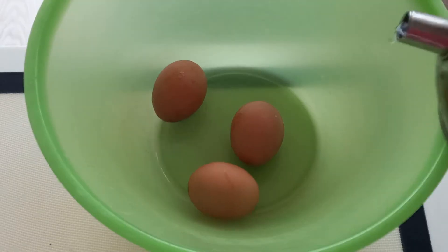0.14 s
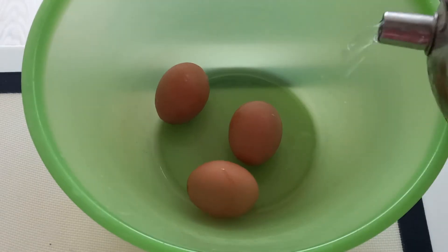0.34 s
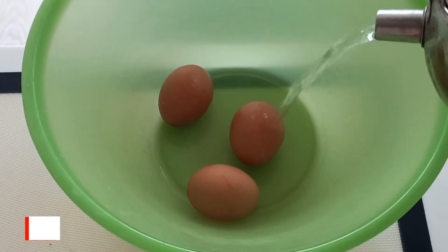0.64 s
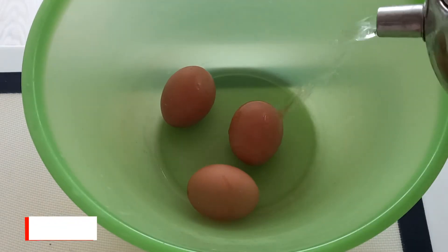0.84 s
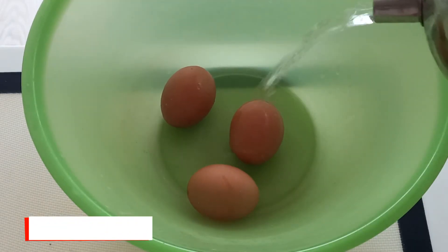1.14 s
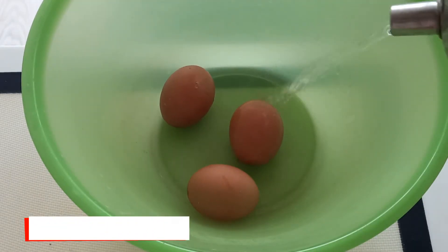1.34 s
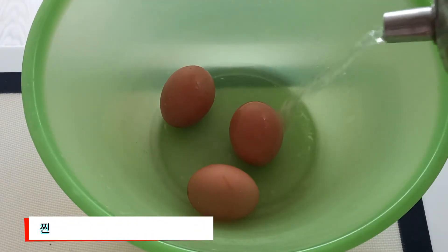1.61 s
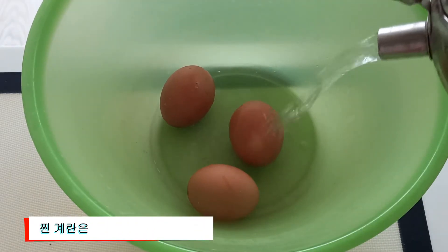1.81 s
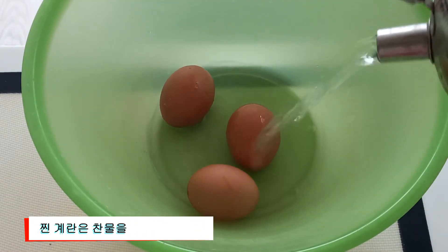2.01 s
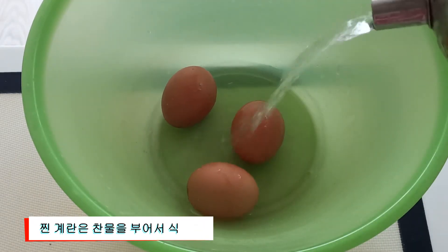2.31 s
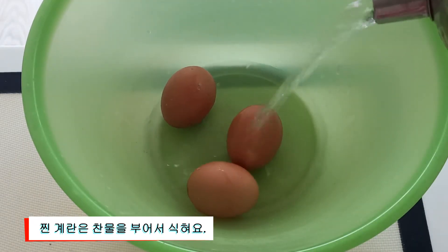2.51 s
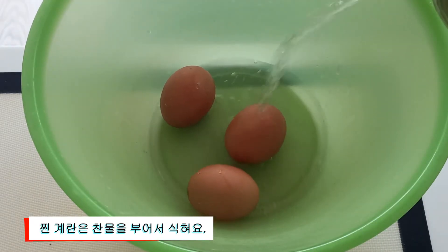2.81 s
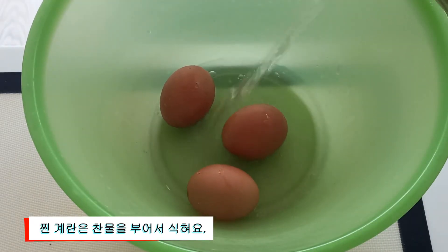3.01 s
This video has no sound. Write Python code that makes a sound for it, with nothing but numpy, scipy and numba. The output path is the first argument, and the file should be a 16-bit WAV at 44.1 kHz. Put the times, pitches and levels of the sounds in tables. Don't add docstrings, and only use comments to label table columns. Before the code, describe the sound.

Pouring water splashes into a shallow plastic bowl of eggs after a short kettle knock and rattle; lively plops, gulps and crisp droplets continue to the end, close to a phone in a small room.

```python
import sys
import numpy as np
from scipy import signal
from scipy.fft import rfft, irfft
from scipy.io import wavfile
from scipy.ndimage import uniform_filter1d
from numba import njit

SR = 44100
rng = np.random.default_rng(int(sys.argv[2]) if len(sys.argv) > 2 else 0)


def decibels_to_gain(level_db):
    exponent = np.asarray(level_db, float) / 20
    return 10 ** exponent


def wav_out(sig):
    wavfile.write(sys.argv[1], SR, np.round(np.clip(np.atleast_2d(sig).T, -1, 1) * 32767).astype(np.int16))


N = 138915

# start in seconds, level in dB, pitch in Hz.
AIR_GULPS = [(0.384, -47.5, 446), (0.686, -47, 460), (0.888, -47, 433), (1.122, -45, 320),
             (1.235, -42, 436), (1.482, -43.5, 423), (1.6, -41.5, 451), (1.779, -44, 405),
             (1.891, -38, 448), (2.128, -47.5, 456), (2.242, -44.5, 447), (2.357, -48, 379),
             (2.479, -38.5, 449.5), (2.593, -45, 435), (2.726, -41, 464), (2.894, -44, 491),
             (0.611, -59.5, 396), (0.843, -53.5, 345), (0.959, -48.5, 356.5), (1.536, -50, 404),
             (1.676, -49.5, 431), (1.976, -52, 458), (2.16, -51, 349.6), (2.529, -71, 437),
             (2.712, -44.5, 418), (3.005, -51.5, 466)]
# start in seconds, level in dB, pitch in Hz, ring time in seconds.
PLOP_BUBBLES = [(.552, -47.5, 1420, 0.04), (.645, -42.5, 868, 0.29), (.692, -30.5, 1064, 0.027),
                (.766, -32, 1235, 0.023), (.777, -27, 1356, 0.035), (.808, -25, 950, 0.013),
                (.924, -27, 1165, 0.035), (1.002, -42.5, 669, 0.14), (1.081, -32, 1350, 0.023),
                (1.117, -44, 584, 0.054), (1.259, -36, 555, 0.048), (1.28, -38.5, 1073, 0.057),
                (1.292, -42.5, 685, .15), (1.343, -47, 668, 0.17), (1.367, -36.5, 1080, 0.036),
                (1.497, -28, 956, .06), (1.542, -41, 990, 0.039), (1.58, -30.5, 1389, 0.046),
                (1.608, -24, 1048, 0.029), (1.612, -35.5, 682, 0.04), (1.664, -60, 950, 0.027),
                (1.694, -26, 1180, 0.051), (1.74, -34.5, 1362, 0.083), (1.776, -34, 1000, 0.026),
                (1.791, -36.5, 863, 0.071), (1.851, -35.5, 690, 0.17), (1.892, -35, 920, .08),
                (2.013, -23.5, 1033, 0.032), (2.047, -49, 870, 0.044), (2.104, -35.5, 653, 0.04),
                (2.123, -32, 890, 0.033), (2.135, -30.5, 1003, 0.039), (2.163, -41, 1020, 0.037),
                (2.24, -31.5, 856, 0.026), (2.252, -30, 986, 0.047), (2.298, -45.5, 1125, 0.16),
                (2.35, -36, 903, .04), (2.388, -38.5, 690, 0.079), (2.452, -32.5, 1216, 0.03),
                (2.489, -26, 940, 0.033), (2.535, -38.5, 1100, 0.046), (2.55, -43, 690, 0.067),
                (2.595, -32.5, 735, 0.04), (2.615, -34, 697, 0.05), (2.707, -35.5, 888, 0.086),
                (2.73, -25, 852, 0.055), (2.89, -42.5, 688, 0.1), (2.938, -36, 707, 0.12),
                (2.989, -26, 1000, 0.031), (3.123, -42.5, 1410, 0.044)]
# start in seconds, level in dB, pitch in Hz.
DROP_TICKS = [(0.534, -35.5, 6270), (0.6802, -32.5, 2720), (0.767, -28.5, 2680), (0.7796, -25.5, 2360),
              (0.9703, -31.5, 6030), (1.052, -22.5, 6850), (1.0811, -27, 2456), (1.3442, -32, 2830),
              (1.4182, -19.5, 6620), (1.7297, -18, 6500), (1.887, -20.5, 3930), (1.901, -24.5, 2700),
              (1.9455, -16, 6200), (1.9583, -22, 5840), (2.0464, -13.5, 6080), (2.127, -34, 2800),
              (2.2416, -27.5, 2710), (2.2713, -26, 2800), (2.3018, -27.5, 5600), (2.4483, -26, 2510),
              (2.5265, -22.5, 3620), (2.628, -20.5, 4200), (2.7092, -25.5, 2800), (2.7569, -17.5, 2030),
              (2.858, -19, 6600), (3.0018, -28.5, 2960), (0.649, -34, 1636), (0.7205, -32.5, 5340),
              (1.1504, -32, 4700), (1.2395, -41, 2280), (1.2586, -31.5, 2020), (1.4774, -37.5, 2780),
              (1.607, -38, 2860), (1.75, -25.5, 5430), (1.7758, -35.5, 2830), (1.814, -42, 5270),
              (1.8441, -28, 4730), (1.8534, -21.5, 6600), (1.993, -25, 6040), (2.0106, -17, 6360),
              (2.163, -32.5, 2680), (2.3222, -31.5, 1530), (2.3521, -28.5, 2800), (2.478, -33.5, 2970),
              (2.5147, -23, 6140), (2.5881, -25.5, 6700), (2.5981, -33.5, 2790), (2.8884, -32, 6300),
              (2.9618, -25.5, 3700), (3.087, -30, 6420)]
# start in seconds, level in dB.
FILM_SNAPS = [
    (2.478, -28.5),
    (2.9604, -22.5),
]
# time in seconds, splash level in dB.
STREAM_FLOW = [(0.523, -47.5), (.6, -62.5), (.7, -46), (0.818, -59), (1.02, -57.5), (1.1, -46.5),
               (1.23, -52), (1.33, -47.5), (1.682, -46.5), (1.72, -41.5), (2.04, -43.5), (2.21, -50.5),
               (2.3, -47), (2.82, -46), (2.981, -42.5), (3.06, -100), (3.14, -43)]
# start in seconds, level in dB.
SPRAY_BURSTS = [(0.7617, -35.5), (1.053, -44.5), (1.142, -42), (1.2548, -31.5), (1.422, -39),
                (1.711, -35.5), (1.889, -30), (2.0173, -40.5), (2.278, -36), (2.322, -52), (2.477, -40),
                (2.6153, -30.5), (2.7127, -29.5), (2.852, -34.5), (2.957, -33), (3.081, -49)]
# frequency in Hz, level in dB per Hz.
SPLASH_COLOUR = [(1200, -10.5), (2000, -4.5), (2900, -5.5), (3500, -3.5), (5200, -4), (6600, 5.5),
                 (7300, -2)]
# frequency in Hz, level in dB per Hz.
SPRAY_COLOUR = [(7700, -25), (8600, -7), (13000, 2), (15800, 1.5)]
# frequency in Hz, level in dB per Hz.
SLOSH_COLOUR = [(45, -29), (72, 3.5), (130, -5.5), (220, -14.5), (400, 4), (1500, -26)]
# frequency in Hz, level in dB, 60 dB decay time in seconds.
BOWL_MODES = [(385, -8, .1), (447, -3, .1), (695, -1, .13), (888, -3, .1)]
# start in seconds, level in dB, rattle length in seconds.
KETTLE_BUMPS = [
    (0.163, -12.5, 0.021),
    (0.212, -19, 0.026),
    (0.249, -36, 0.011),
    (0.26, -22, 0.022),
    (0.319, -41, 0.023),
]
# frequency in Hz, bandwidth in Hz, level in dB.
KETTLE_MODES = [(560, 35, 7), (808, 40, 7), (1187, 120, 0)]
# frequency in Hz, level in dB per Hz.
CLATTER_COLOUR = [(60, -46), (115, -9), (250, -19.5), (500, -4.5), (2200, -18), (3000, -33.5),
                  (7000, -47.5)]
# frequency in Hz, level in dB per Hz.
KITCHEN_COLOUR = [(40, -34), (75, 4), (175, -13), (260, -9), (3000, -34), (16000, -44)]

BUBBLES_PER_S, DROPS_PER_S, MIST_PER_S = 110, 500, 2500
BUMP_DB, CLATTER_DB = -12.5, -7.5
THUD_S, THUD_HZ, THUD_DB = 0.295, 76, -32
ROOM_T60_S, ROOM_DB, ROOM_DULL_HZ = 0.34, -4, 3320
KITCHEN_DB = -69.5
TOP_HZ = 15900


def shape(x, points):
    p = np.array(points, float)
    log_hz = np.log(np.arange(N // 2 + 1) * SR / N + 1)
    log_points = np.log(p[:, 0])
    beyond = np.maximum(log_points[0] - log_hz, 0) + np.maximum(log_hz - log_points[-1], 0)
    db = np.interp(log_hz, log_points, p[:, 1]) - 40 * beyond
    return irfft(rfft(x) * decibels_to_gain(db), N)


def unit(x):
    return x / np.sqrt(np.mean(x ** 2))


def hiss(like):
    mid, side = rng.standard_normal((2, N))
    like = np.clip(like, 0, 1)
    common = mid * np.sqrt(1 + like)
    differing = side * np.sqrt(1 - like)
    return np.array([common + differing, common - differing]) / np.sqrt(2)


@njit
def rings(rows, n, sr):
    out = np.zeros((2, n))
    for s, size, hz, t60, rise, glide, pan, lag in rows:
        for c in range(2):
            start = (s + lag * (c - .5)) * sr
            first = max(int(start) + 1, 0)
            last = min(first + int((t60 + 3 * rise) * sr), n)
            gain = size * (pan if c == 0 else 1 / pan)
            for i in range(first, last):
                t = (i - start) / sr
                envelope = (1 - np.exp(-t / rise)) * np.exp(-np.log(1000) * t / t60)
                out[c, i] += gain * envelope * np.sin(2 * np.pi * hz * t * (1 + glide * t / 2))
    return out


def bubbles(s, db, hz, t60, rise, glide, pan_db, lag_s):
    t60 = np.maximum(t60, 1e-4)
    rise = np.maximum(rise, 1e-5)
    columns = np.broadcast_arrays(s, decibels_to_gain(db), hz, t60, rise, glide, decibels_to_gain(pan_db / 2), lag_s)
    return rings(np.ascontiguousarray(np.array(columns, float).T), N, float(SR))


def fades(rows, rise_s):
    t = np.arange(N) / SR
    out = np.zeros(N)
    for s, db, t60 in rows:
        since = np.maximum(t - s, 0)
        decay = decibels_to_gain(-60 * np.minimum(since / max(t60, 1e-3), 4))
        out += decibels_to_gain(db) * (1 - np.exp(-since / rise_s)) * decay
    return out


def walk(rate):
    k = int(SR / rate)
    steps = np.repeat(rng.standard_normal(N // k + 1), k)
    return 1.3 * uniform_filter1d(steps, k)[:N]


def patchy():
    return 3.5 * walk(90)


def ring(x, hz, width):
    return signal.lfilter(*signal.iirpeak(hz, hz / width, fs=SR), x)


def gurgle():
    s, db, hz = np.array(AIR_GULPS).T
    gulps = bubbles(s - .006, db + 6, hz * .9, t60=0.12, rise=0.013, glide=6.23, pan_db=-5.5, lag_s=0)
    s, db, hz, ring_s = np.array(PLOP_BUBBLES).T
    c = rng.standard_normal((len(s), 6)).T
    plops = bubbles(s - .001, db - 0.5, hz * .98, ring_s, rise=0.00086, glide=2.39,
                    pan_db=5.0 * c[0], lag_s=0.000099 * c[1])
    twin_hz = hz * (1 + 0.22 * np.sign(c[3]))
    twins = bubbles(s + 0.003067 * abs(c[2]), db, twin_hz, 0.22 * ring_s, rise=0.00054, glide=3.0,
                    pan_db=11.0 * c[1], lag_s=0.00015 * c[0])
    rough = decibels_to_gain(1.5 * walk(150))
    return bowl((gulps + plops + twins) * rough)


def ticks():
    s, db, hz = np.array(DROP_TICKS).T
    c = rng.standard_normal((len(s), 2)).T
    pan_db, lag_s = 2 * c[1], 4e-5 * c[0]
    note = bubbles(s - .0004, db - 6, hz, 30 / hz + 0.0027, 0.0001, 7.0, pan_db, lag_s)
    crack = bubbles(s, db, 1.1 * hz, 5 / hz, .00005, 0, pan_db, lag_s)
    crack = signal.lfilter(*signal.butter(2, 900, "high", fs=SR), crack)
    noise = hiss(0.16)
    spatter = np.zeros((2, N))
    for start, level, f in zip(s, db, hz):
        band = unit(ring(ring(noise, f, 0.17 * f), f, 1.56 * f))
        spatter += fades([(start, level - 11, 200 / f + 0.0046)], 0.0013) * band
    snaps = fades([(a, b, .02) for a, b in FILM_SNAPS], 0.00032) * unit(shape(noise, SPRAY_COLOUR))
    dull = signal.ellip(6, 1, 18, 7050, fs=SR, output="sos")
    drops = decibels_to_gain(2) * note + decibels_to_gain(8) * crack + spatter * decibels_to_gain(patchy())
    return signal.sosfilt(dull, drops) + snaps


def grains(rate, lo_hz, hi_hz, cycles, spread_db, rise_cycles):
    c = rng.random((int(rate * N / SR), 5)).T
    hz = lo_hz * (hi_hz / lo_hz) ** c[1]
    db = -spread_db * np.log(c[2] + 0.0016)
    pan_db, lag_s = 9 * (c[3] - .5), 0.00037 * (c[4] - .5)
    return unit(bubbles(c[0] * N / SR, db, hz, cycles / hz, rise_cycles / hz, 0.008 * hz, pan_db, lag_s))


def clumps():
    total = np.zeros((2, N))
    for hz in 1200 * 1.3 ** np.arange(8):
        band = ring(ring(hiss(0.29), hz, 0.55 * hz), hz, 0.54 * hz)
        total += band / np.sqrt(hz) * decibels_to_gain(5.57 * walk(35))
    return unit(total)


def stream():
    t, flow = np.arange(N) / SR, np.array(STREAM_FLOW)
    on = np.clip((t - flow[0, 0]) / 0.038, 0, 1)
    flow_db = np.interp(t, flow[:, 0], flow[:, 1])
    burst = fades([(s, db, .3) for s, db in SPRAY_BURSTS], 0.0062) * decibels_to_gain(patchy())

    blobs = bowl(grains(BUBBLES_PER_S, 406, 4550, 24.0, 1.3, 0.27)) * decibels_to_gain(flow_db - 11)

    drops = grains(DROPS_PER_S, 860, 8900, 9.6, 3.5, 0.49) + 1.14 * clumps()
    patter_db = 2 * walk(25)
    splash_gain = decibels_to_gain(flow_db - 7.0 + patter_db) + decibels_to_gain(-6.0) * burst
    splash = unit(shape(drops, SPLASH_COLOUR)) * splash_gain

    mist = grains(MIST_PER_S, 8240, 12000, 7.3, 3.2, 0.5) + 0.74 * hiss(0.25)
    spray_gain = decibels_to_gain(flow_db - 14 + 2.74 * walk(31.5)) + decibels_to_gain(-11.5) * burst
    spray = unit(shape(mist, SPRAY_COLOUR)) * spray_gain

    heave_db = 3 * walk(14)
    slosh_db = -61.5 + 0.2 * (flow_db + 52) + heave_db
    slosh = unit(shape(hiss(0.57), SLOSH_COLOUR)) * decibels_to_gain(slosh_db)
    return on * (blobs + splash + spray + slosh)


def bowl(x):
    return x + sum(decibels_to_gain(db) * ring(x, hz, 4 / t60) for hz, db, t60 in BOWL_MODES)


def kettle_bumps():
    push = fades([(s - .001, db, 6 * length) for s, db, length in KETTLE_BUMPS], 0.0009)
    noise = hiss(.92)
    rattle = push * noise
    body = np.zeros((2, N))
    for k, (hz, width, db) in enumerate(KETTLE_MODES):
        body += (-1) ** k * decibels_to_gain(db) * ring(rattle, hz, width)
    clatter = push * shape(noise, CLATTER_COLOUR)
    scale = np.sqrt(np.mean(rattle ** 2))
    impact = scale * (decibels_to_gain(BUMP_DB) * unit(body) + decibels_to_gain(CLATTER_DB) * unit(clatter))

    knock = bubbles([.1628, .217, .2605], [-5, -13, -12], [800, 600, 800], .022, .002, 0, 0, 0)
    thud = bubbles([THUD_S, .2], [THUD_DB, -44], [THUD_HZ, 110], 0.13, 0.0022, 0, 0, 0)
    bright_noise = unit(shape(hiss(0.21), [(3000, -17), (7000, -14.5), (15500, -22.5)]))
    bright = fades([(KETTLE_BUMPS[0][0], -54, .35)], 0.0008) * decibels_to_gain(patchy()) * bright_noise
    return impact + thud + bright + knock


def room(x):
    t = np.arange(SR) / SR
    decay = decibels_to_gain(-60 * t / ROOM_T60_S) * (t > .003)
    mid, side = rng.standard_normal((2, SR)) * decay
    side = signal.lfilter(*signal.butter(1, 700, "high", fs=SR), side)
    tail = np.array([mid + side, mid - side]) / np.sqrt(2 * np.sum(mid ** 2))
    dull = signal.lfilter(*signal.butter(1, ROOM_DULL_HZ, fs=SR), x.mean(axis=0))
    return decibels_to_gain(ROOM_DB) * signal.fftconvolve(tail, dull[None], axes=1)[:, :N]


def kitchen_floor():
    return decibels_to_gain(KITCHEN_DB) * unit(shape(hiss(0.42), KITCHEN_COLOUR))


def scene():
    near = gurgle() + ticks() + stream() + kettle_bumps()
    near = near * decibels_to_gain([[-.6], [.6]])
    return near + room(near) + kitchen_floor()


def low_pass(x):
    return signal.sosfilt(signal.butter(12, 16970, fs=SR, output="sos"), x)


def record(dry):
    no_rumble = signal.lfilter(*signal.butter(2, 50, "high", fs=SR), dry)
    mix = signal.sosfilt(signal.ellip(8, .2, 45, TOP_HZ, fs=SR, output="sos"), no_rumble)
    return low_pass(mix)


dry = scene()
out = record(dry)
wav_out(out)
```